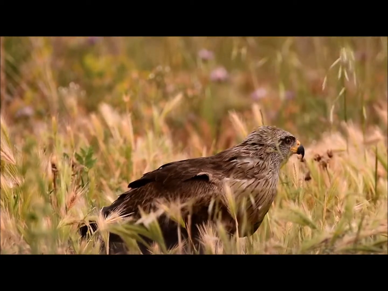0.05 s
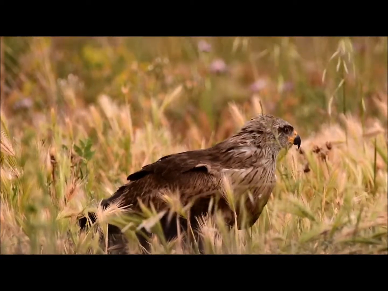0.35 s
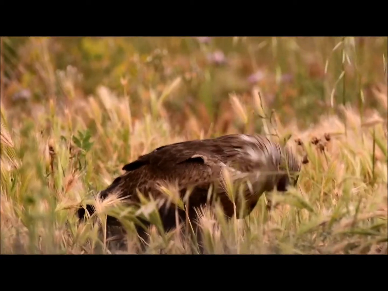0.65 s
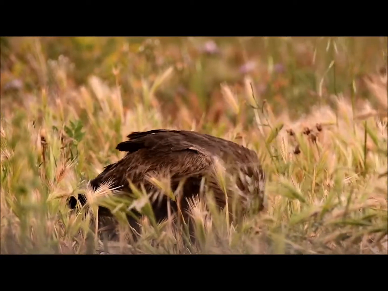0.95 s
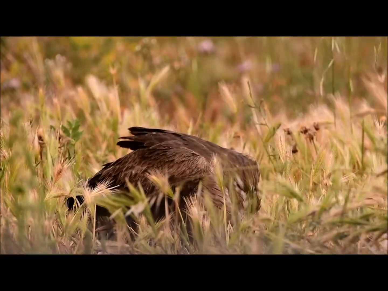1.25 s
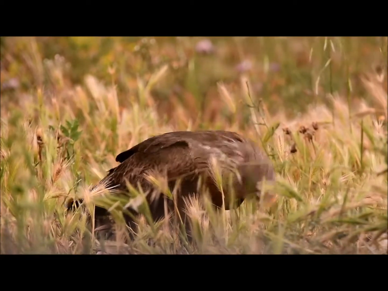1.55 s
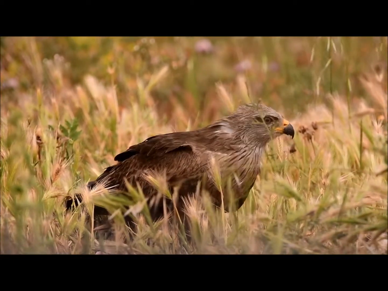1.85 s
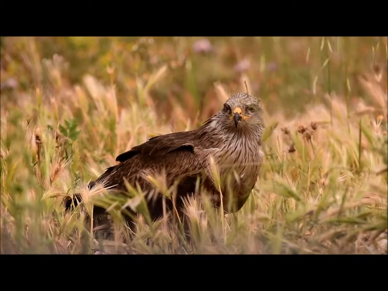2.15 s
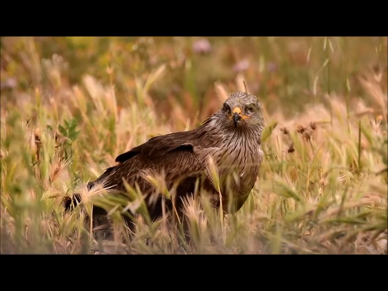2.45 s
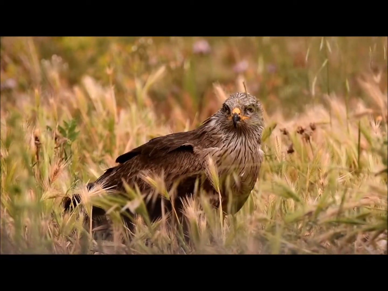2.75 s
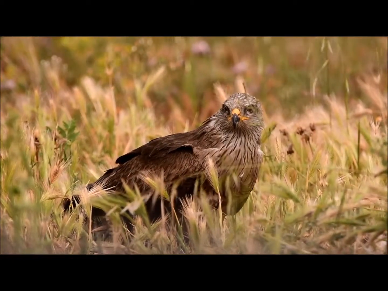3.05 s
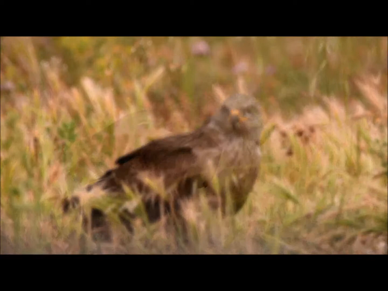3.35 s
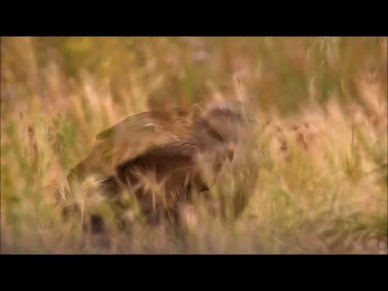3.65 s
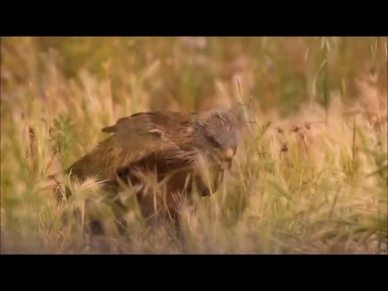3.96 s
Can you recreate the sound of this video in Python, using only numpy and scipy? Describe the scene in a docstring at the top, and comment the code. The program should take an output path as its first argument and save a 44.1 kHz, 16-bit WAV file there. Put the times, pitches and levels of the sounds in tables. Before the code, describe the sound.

Rapid, high insect rasping in dry grass pauses, resumes, and something snaps close by.

```python
"""An insect rasps in dry grass, nine chirps a second, pauses briefly and starts again.
Each chirp is a run of tooth strikes that rings narrow wing resonances. Faint birds whistle
in the distance and a few grass stems tick; late on, something snaps sharply close to the
microphone, on the right. Behind it all lie the low rush and fine hiss of open air.
Two narrow notches colour the whole sound."""
import sys
import numpy as np
from scipy import signal
from scipy.fft import rfft, irfft, next_fast_len
from scipy.io import wavfile
from scipy.ndimage import uniform_filter1d, map_coordinates

SR = 44100
rng = np.random.default_rng(int(sys.argv[2]) if len(sys.argv) > 2 else 0)


def wav_out(sig):
    """Save sig, one row per channel (or a flat mono array), as 16-bit PCM at SR to the path in sys.argv[1]."""
    wavfile.write(sys.argv[1], SR, np.round(np.clip(np.atleast_2d(sig).T, -1, 1) * 32767).astype(np.int16))


N = 176400


def insect(teeth_per_s=3500, stroke_hz=71.4, stroke_depth=0.27, rise_share=0.54, squareness=2.47):
    """Swelling runs of tooth strikes rasp and ring the wings; the field scatters the sound."""
    # chirps: peak_s, level_db, length_s
    chirps = [(0.122, -55.5, 0.06), (0.222, -54.5, 0.063), (0.315, -51.5, 0.057), (0.414, -52.5, 0.057),
              (0.538, -50.5, 0.067), (0.662, -53, 0.071), (0.769, -52, 0.075), (0.866, -50.5, 0.064),
              (0.977, -50, 0.073), (1.087, -54.5, 0.083), (1.213, -50.5, 0.073), (1.311, -52, 0.061),
              (1.429, -49.5, 0.069), (1.515, -51.5, 0.08), (1.633, -48.5, 0.057), (1.742, -49.5, 0.067),
              (1.851, -50.5, 0.061), (1.957, -53, 0.053), (2.072, -47, 0.066), (2.787, -51.5, 0.065),
              (2.888, -50, 0.074), (2.978, -47, 0.053), (3.08, -50.5, 0.053), (3.211, -49, 0.088),
              (3.327, -48, .062), (3.432, -47.5, 0.058), (3.536, -51, 0.085), (3.638, -52, 0.076),
              (3.744, -55, 0.058), (3.862, -53.5, 0.082), (3.972, -57.5, 0.047)]
    t = np.arange(N) / SR
    swell = np.zeros(N)
    for peak_s, db, length_s in chirps:
        flank_s = length_s * np.where(t < peak_s, rise_share, 1 - rise_share)
        swell += amp(db) * np.exp(-np.abs((t - peak_s) / flank_s) ** squareness)
    stroke_phase = 2 * np.pi * np.cumsum(stroke_hz * (1 + 0.06 * wobble(16))) / SR
    flutter = 1 + stroke_depth * np.sin(stroke_phase)
    strikes = rng.random((3, N)) < teeth_per_s / SR
    teeth = unit(strikes * flutter) * swell
    chirping = np.sqrt(np.mean(swell ** 2)) * (amp(-4) * rasp(teeth[:2]) + wing_ring(teeth[2]))
    direct = shifting_resonances(treble_drift(chirping))
    return direct + amp(-15) * echo(direct, t60_s=0.73)


def rasp(teeth):
    """The strikes heard as a broad band of noise."""
    # rasp spectrum: frequency_hz, level_db
    spectrum = [(2000, -44), (2800, -12.5), (3300, -0.5), (3900, 6.5), (4400, 0), (4900, 0.5), (5600, -0.5),
                (6300, -5), (7200, -43), (10000, -77)]
    # balance at the microphone: frequency_hz, left_over_right_db
    balance = [(3300, 10.5), (4000, -0.5), (4700, -1), (5300, -3)]
    return unit(filtered(teeth, lambda f: amp(along(spectrum, f)) * pan(along(balance, f)) * (f > 1000)))


def wing_ring(teeth, width_hz=33, left_phase_rad=2.12):
    """The strikes ring narrow resonances of the wings."""
    # wing resonances: pitch_hz, level_db, left_over_right_db
    resonances = [(3755, -8, -2), (3885, -2, -3), (3990, -3, -14), (4222, 1, 0), (4298, -4, -7),
                  (4490, -5, 2), (4810, -8, -5), (5160, -7, -7), (5305, -11, -8)]

    def response(f):
        damping = 1j * f * width_hz
        modes = sum(amp(db) * pan(pan_db) * damping / (hz * hz - f * f + damping)
                    for hz, db, pan_db in resonances)
        band = 1 / (1 + (3000 / (f + 1)) ** 12) / (1 + (f / 6500) ** 12)
        return modes * band * np.exp(1j * left_phase_rad * np.array([[1], [0]]))
    return unit(filtered(teeth, response))


def treble_drift(x, corner_hz=5200):
    """The chirps slowly dull and brighten."""
    # treble gain: time_s, gain_db
    gains = [(.25, 2.5), (.6, -2.5), (1.95, -6), (2.9, 1.5), (3.56, 7), (3.85, -11)]
    treble = filtered(x, lambda f: 1 / (1 + (corner_hz / (f + 1)) ** 20))
    return x + treble * (fader(gains) - 1)


def shifting_resonances(x, depth_db=2.5, size=1024):
    """Resonances come and go from chirp to chirp: narrow patches of random gain."""
    frames = signal.stft(x, nperseg=size)[2]
    patches = uniform_filter1d(rng.standard_normal(frames.shape[1:]), size=3, axis=0)
    patches = uniform_filter1d(patches, size=6, axis=1)
    shifted = signal.istft(frames * amp(depth_db * unit(patches)), nperseg=size)[1][:, :N]
    return unit(shifted) * np.sqrt(np.mean(x ** 2))


def snaps(attack_s=0.00035, crack_t60_s=0.0089, crack_pan_db=-7):
    """Each close snap is a brief crack and fast-dying modes; lower snaps ring longer."""
    # snaps and one soft knock: start_s, level_db, pitch_factor, left_over_right_db, crack_gain_db
    events = [(3.1564, -28, 1.5, -14, -10), (3.1578, -32.5, 0.97, -21, -12), (3.3539, -36.5, 0.85, -9, 0.5),
              (3.3578, -44.5, 0.25, 2, -12), (3.4864, -7.5, 0.996, -19.5, -12)]
    # modes at pitch factor 1: pitch_hz, level_db, t60_s
    modes = [(400, -28.5, 0.0087), (1302, -9.5, 0.012), (1590, -8, 0.0055), (2045, -0.5, 0.013),
             (1980, -22, 0.042), (2200, -21.5, 0.018), (3460, -12, 0.0062), (5540, -13.5, 0.0053)]
    # crack spectrum: frequency_hz, level_db
    spectrum = [(100, -9), (400, -23), (1000, -27), (1800, -1), (4400, 16.5), (6500, 9.5), (15000, -15)]
    out, t = np.zeros((2, N)), np.arange(SR // 10) / SR
    attack = 1 - np.exp(-t / attack_s)
    for start_s, db, pitch, pan_db, crack_db in events:
        ring = sum((-1) ** k * amp(mode_db - 60 * t * pitch / t60) * np.sin(2 * np.pi * hz * pitch * t)
                   for k, (hz, mode_db, t60) in enumerate(modes))
        crack = noise(spectrum)[:, :len(t)] * amp(crack_db - 60 * t / crack_t60_s)
        add(out, start_s, amp(db) * (pan(pan_db) * ring + pan(crack_pan_db) * crack) * attack)
    return out


def grass_ticks(t60_s=0.011):
    """Dry stems tick: tiny bursts of bright noise."""
    # ticks: start_s, level_db
    ticks = [(.927, -53), (1.536, -48), (1.905, -51.5), (3.271, -44)]
    out, t = np.zeros((2, N)), np.arange(SR // 10) / SR
    for start_s, db in ticks:
        burst = noise([(1000, -16), (4000, 5), (9000, -1), (15000, -31)])[:, :len(t)]
        add(out, start_s, burst * amp(db - 60 * t / t60_s))
    return out


def birds(pan_db=-3.5, pipe_s=0.06, pipe_hz=2006, pipe_edge_hz=1914):
    """Distant whistles, a scratchy phrase and a low piping note, a little to the right."""
    # clear whistles: start_s, length_s, start_hz, middle_hz, end_hz, level_db
    whistles = [(1.5, 0.07, 5250, 5200, 5170, -56), (2.11, 0.059, 7050, 6930, 7020, -68.5),
                (2.378, 0.048, 6100, 5720, 5780, -59.5), (2.44, 0.055, 4200, 4680, 4400, -51.5),
                (2.535, .06, 4550, 4400, 3760, -66), (2.735, 0.047, 2440, 2480, 2520, -51.5)]
    # hoarse notes: start_s, length_s, start_hz, middle_hz, end_hz, level_db
    scratches = [(2.772, 0.052, 2765, 3100, 2950, -51.5), (2.803, .042, 2984, 2333, 2040, -51.5),
                 (3.118, 0.0417, 1580, 2097, 2250, -52.5), (3.205, 0.047, 4900, 4910, 4670, -49.5),
                 (3.252, .036, 1740, 2024, 2540, -53), (3.306, 0.02, 1820, 1980, 2130, -53),
                 (3.455, .032, 3730, 3480, 2770, -48.5)]
    # repeats of the piping note: start_s, level_db
    repeats = [(3.679, -50), (3.832, -49.5), (3.98, -48)]
    pipes = [(start_s, pipe_s, pipe_edge_hz, pipe_hz, pipe_edge_hz, db) for start_s, db in repeats]
    calls = np.zeros((2, N))
    for notes, rough_rad in [(whistles + pipes, 0.35), (scratches, 1.3)]:
        for start_s, length_s, *pitches_hz, db in notes:
            add(calls, start_s, amp(db) * pan(pan_db) * bird_note(length_s, pitches_hz, rough_rad))
    return calls + amp(-10) * echo(calls, t60_s=1.0)


def bird_note(length_s, pitches_hz, rough_rad, flutter_db=1.8):
    """A tone glides through three pitches; phase jitter makes it hoarse."""
    progress = np.linspace(0, 1, int(length_s * SR))
    hz = np.polyval(np.polyfit([0, .5, 1], pitches_hz, 2), progress)
    phase = 2 * np.pi * np.cumsum(hz) / SR + rough_rad * wobble(600)[:len(hz)]
    envelope = np.sin(np.pi * progress) * amp(flutter_db * wobble(125)[:len(hz)])
    return np.sqrt(2) * envelope * np.sin([phase, phase + 1.75])


def air_rush():
    """Distant air over the field: centred in the bass, wide higher up."""
    # rush spectrum: frequency_hz, level_db
    spectrum = [(22, -29), (50, -3.5), (130, -6), (190, -1), (330, -7), (550, -4.5), (900, -3),
                (1300, -7.5), (2000, -7), (2600, -22.5)]
    # likeness of left and right: frequency_hz, correlation
    likeness = [(250, .92), (500, 0.85), (900, 0.53), (1400, 0.044), (2000, -0.088)]
    # rush loudness: time_s, level_db
    levels = [(2.8, -61), (3.5, -58.5)]

    def spread(f):
        angle = np.arccos(np.clip(along(likeness, f), -1, 1)) / 2
        return np.array([np.cos(angle), np.sin(angle)]) / (1 + (f / 2800) ** 8)
    mid, side = filtered(noise(spectrum), spread)
    return unit(np.array([mid + side, mid - side])) * fader(levels)


def hiss():
    """A fine, wide hiss that lifts near the end."""
    # hiss spectrum: frequency_hz, level_db
    spectrum = [(1000, -14.5), (2800, 1.5), (4200, 1.5), (5500, -0.5), (7000, -5), (9000, -6),
                (12000, -6.5), (15500, -15)]
    # hiss loudness: time_s, level_db
    levels = [(2.8, -65.5), (3.3, -60), (4, -61.5)]
    return noise(spectrum) * fader(levels)


def rumble(peak_s=3.76, width_s=0.082, level_db=-64.5):
    """One soft swell of low noise."""
    swell = np.exp(-((np.arange(N) / SR - peak_s) / width_s) ** 2)
    return noise([(120, 4), (500, -50)])[0] * amp(level_db) * swell


def echo(x, t60_s):
    """Diffuse scatter from the field."""
    t = np.arange(SR // 2) / SR
    tail = rng.standard_normal((2, len(t))) * amp(-60 * t / t60_s)
    return signal.fftconvolve(x, tail / np.linalg.norm(tail[0]), axes=1)[:, :N]


def amp(db):
    """Decibels to gain."""
    return 10 ** (np.asarray(db) / 20)


def unit(x):
    """Scale to rms 1."""
    return x / np.sqrt(np.mean(x ** 2) + 1e-20)


def along(points, hz):
    """Interpolate (frequency_hz, value) points on a log axis."""
    f, values = np.transpose(points)
    return np.interp(np.log(hz + 1), np.log(f + 1), values)


def fader(points):
    """Gain curve through (time_s, level_db) points."""
    return amp(np.interp(np.arange(N) / SR, *np.transpose(points)))


def pan(db):
    """Left and right gains of mean power 1; positive is left."""
    gains = amp(np.array([[.5], [-.5]]) * db)
    return gains / np.sqrt(np.mean(gains ** 2, axis=0))


def wobble(rate):
    """A smooth random curve, rate knots a second."""
    return map_coordinates(rng.standard_normal(int(N * rate / SR) + 4), [np.arange(N) * rate / SR])


def filtered(x, response):
    """Filter x by a function of frequency."""
    size = next_fast_len(N + SR // 2)
    return irfft(rfft(x, size) * response(np.fft.rfftfreq(size, 1 / SR)), size)[..., :N]


def noise(spectrum):
    """Two unrelated noises coloured by (frequency_hz, level_db) points."""
    return unit(filtered(rng.standard_normal((2, N)), lambda hz: amp(along(spectrum, hz))))


def add(out, start_s, x):
    """Mix x in at start_s."""
    i = max(0, round(start_s * SR))
    out[:, i:i + x.shape[-1]] += x[..., :max(0, N - i)]


def scene():
    """The meadow at the microphone; close sounds get only a short scatter."""
    animals = insect() + birds()
    close = snaps() + grass_ticks()
    return animals + close + amp(-12.5) * echo(close, t60_s=0.068) + air_rush() + hiss() + rumble()


def record(dry, steepness=6, top_hz=15800):
    """Two minimum-phase band-stop filters and a steep band limit."""
    # notches: centre_hz, width_hz
    notches = [(2590, 295), (7720, 900)]
    size = next_fast_len(N + SR // 2)
    hz = np.fft.rfftfreq(size, 1 / SR)
    gain = np.prod([1 / np.sqrt(1 + (width / 2 / (np.abs(hz - centre) + 1)) ** steepness)
                    for centre, width in notches], axis=0)
    cepstrum = irfft(np.log(gain + 1e-4), size)
    fold = np.where(np.arange(size) < size // 2, 2, 0)  # the notches ring only after a sound
    fold[0] = 1
    causal = np.exp(rfft(cepstrum * fold))
    return filtered(dry, lambda f: causal * (f < top_hz))


dry = scene()
out = record(dry)
wav_out(out)
```